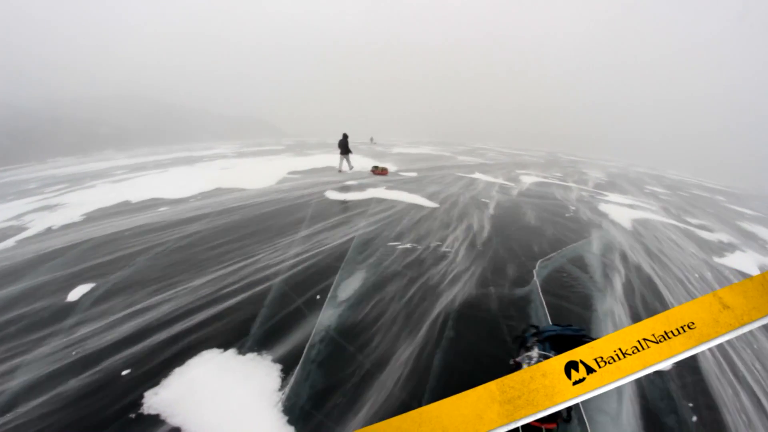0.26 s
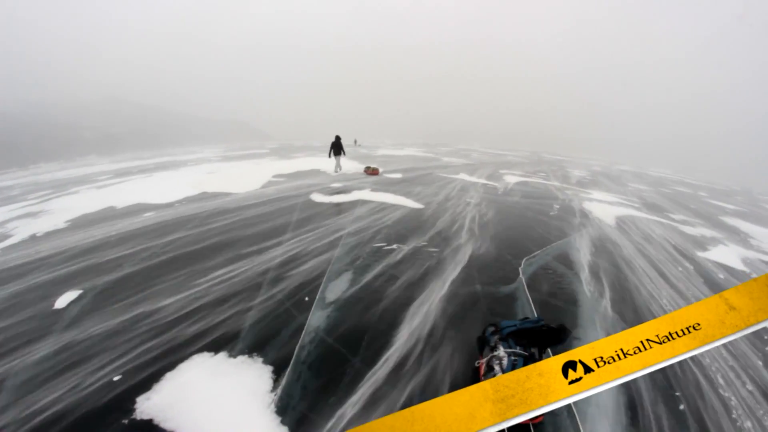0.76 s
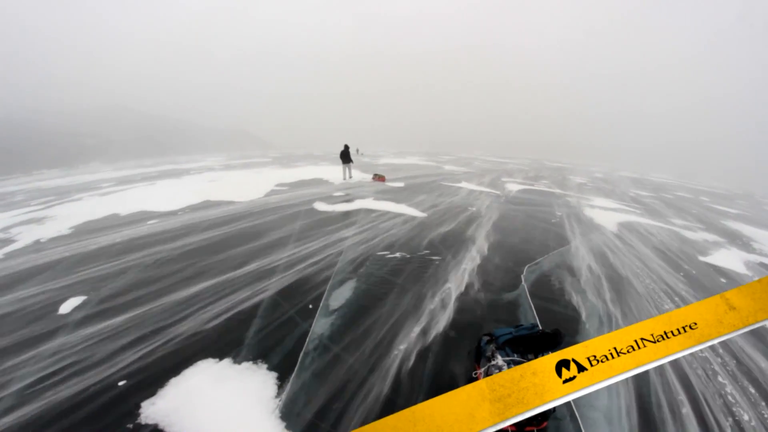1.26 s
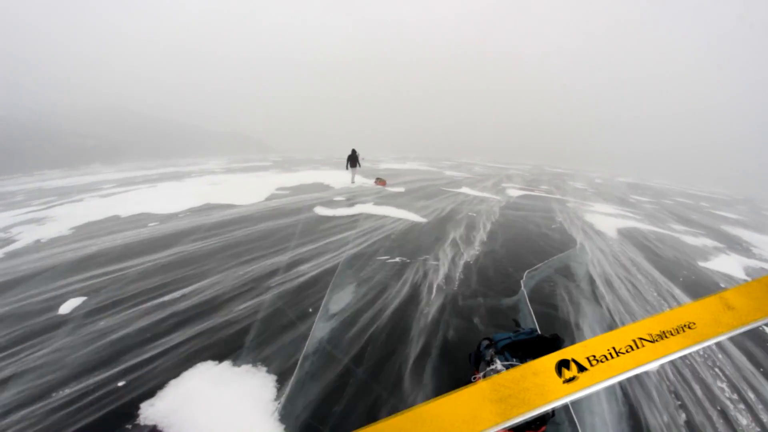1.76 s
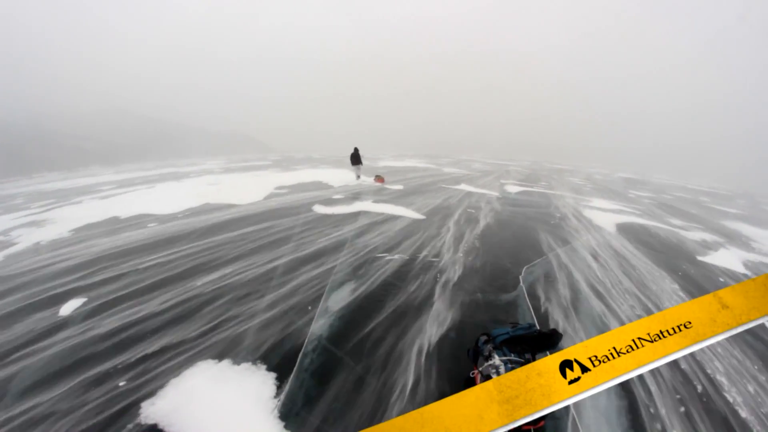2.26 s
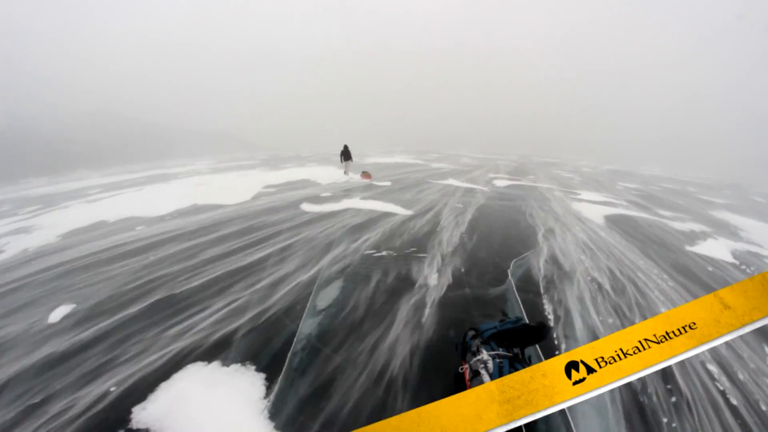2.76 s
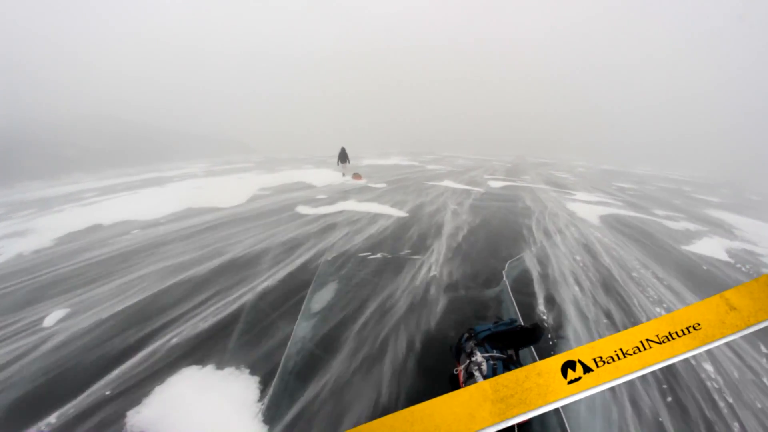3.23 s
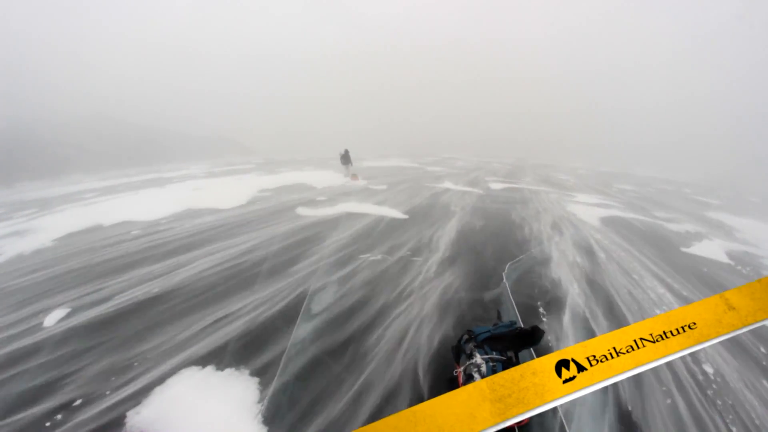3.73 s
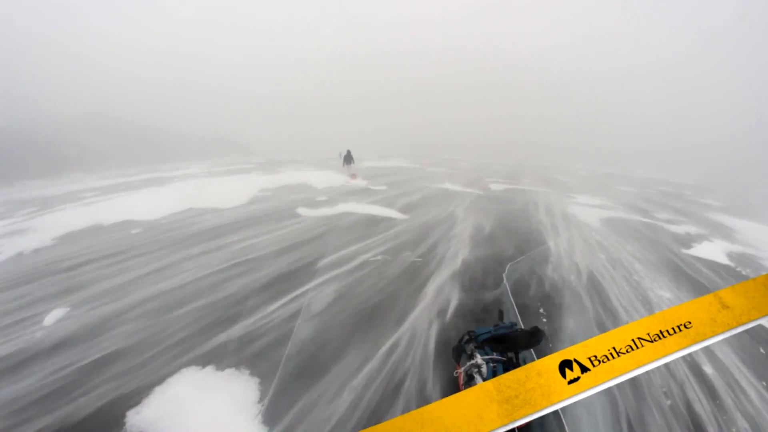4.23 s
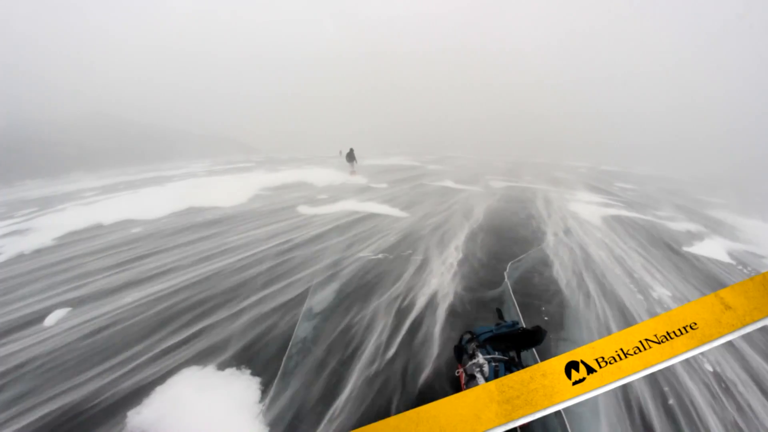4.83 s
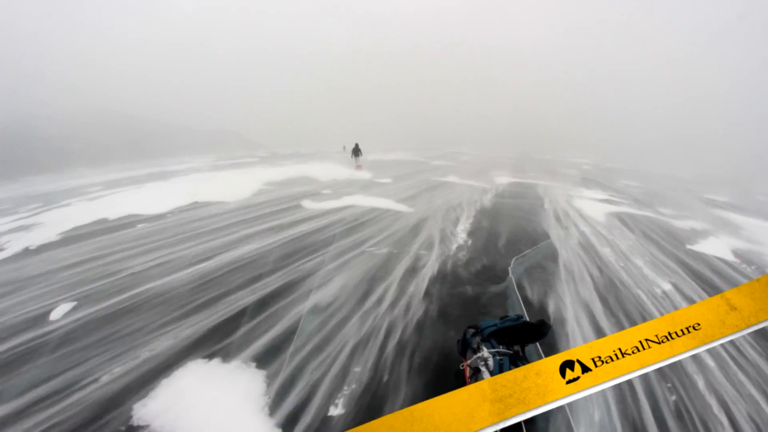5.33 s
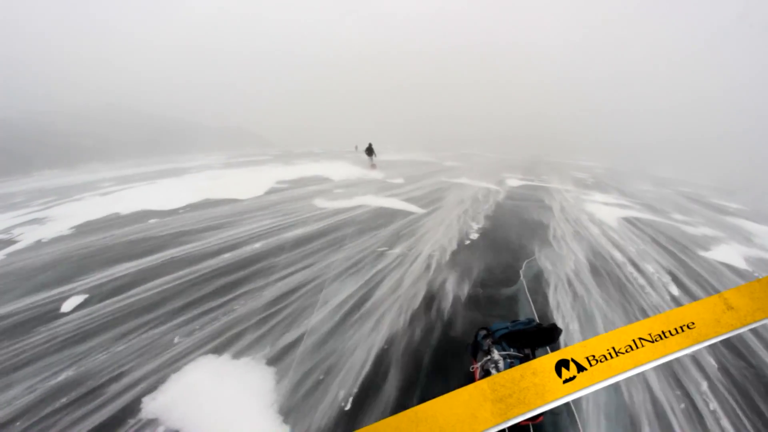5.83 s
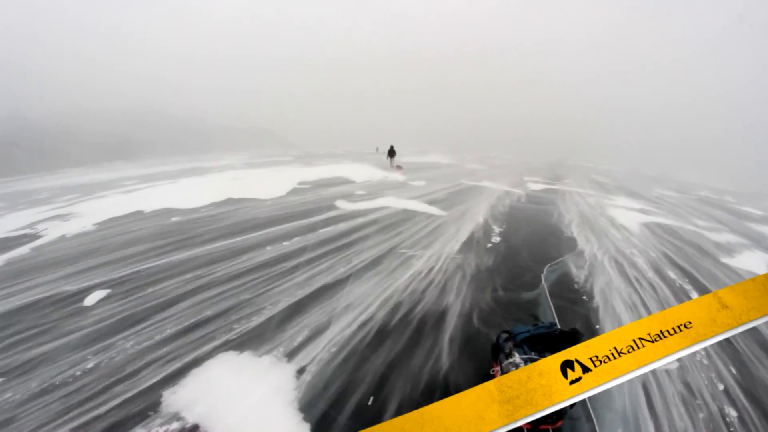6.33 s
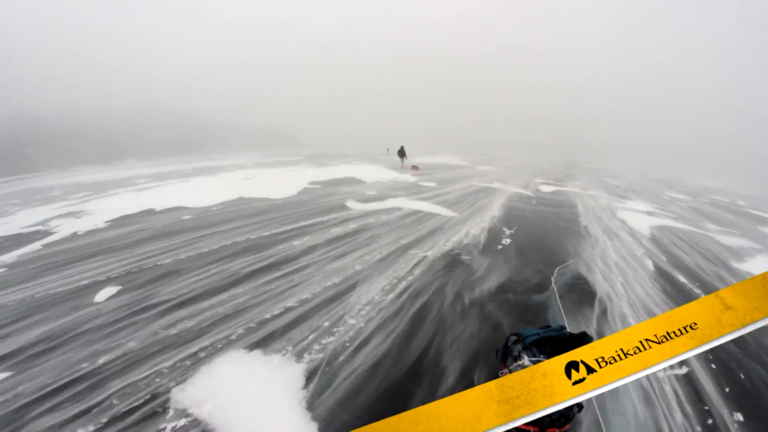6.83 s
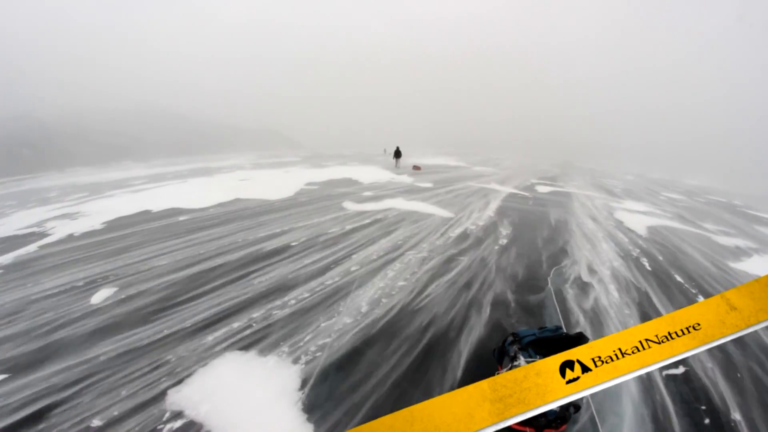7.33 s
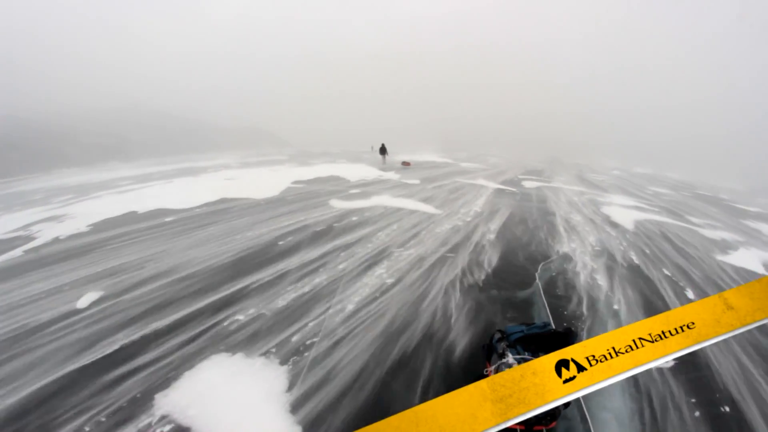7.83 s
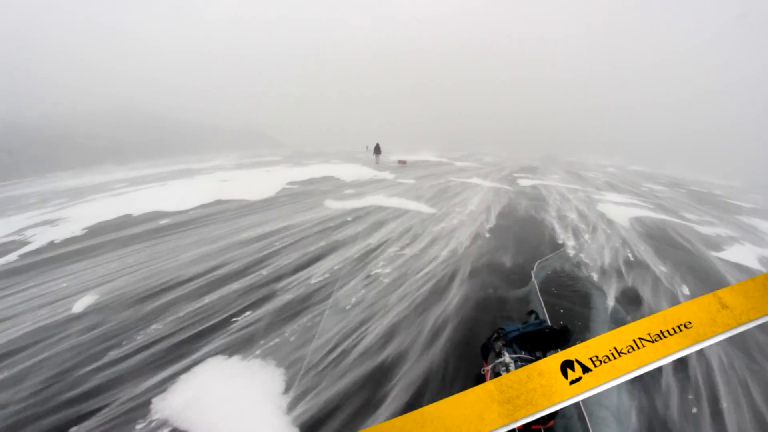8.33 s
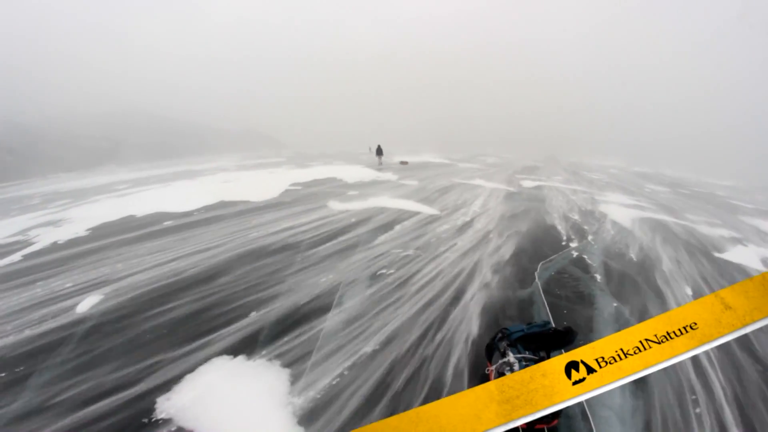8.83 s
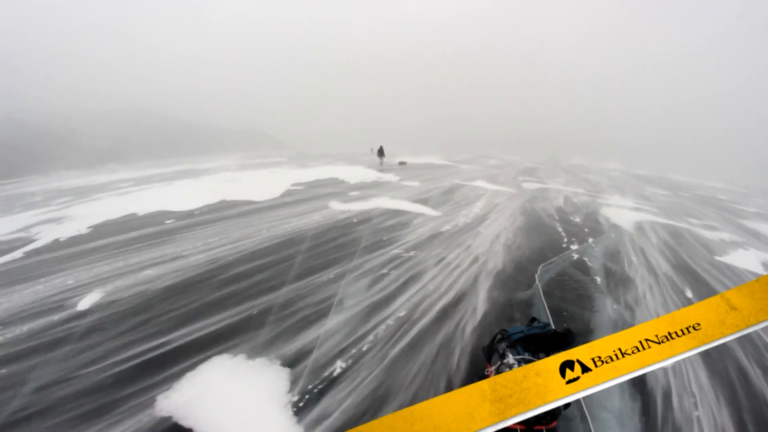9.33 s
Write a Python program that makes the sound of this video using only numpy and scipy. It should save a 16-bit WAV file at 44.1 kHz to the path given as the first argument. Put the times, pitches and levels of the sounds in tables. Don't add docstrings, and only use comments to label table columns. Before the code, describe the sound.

Nothing but blizzard wind hitting a tiny exposed microphone: a dense, overloaded, gritty roar at a nearly constant ceiling, with short dull slaps and millisecond gaps. A weaker, more heaving stretch comes early, a violent crackling passage fills the middle, a steadier rush follows, and a faster, higher-pitched gust peaks near the end. Dry, close, without echo, over open ice, with a thin hiss of drifting snow.

```python
import sys
import numpy as np
from scipy import signal
from scipy.fft import rfft, irfft, next_fast_len
from scipy.io import wavfile
from scipy.ndimage import uniform_filter1d, map_coordinates

SR = 44100
rng = np.random.default_rng(int(sys.argv[2]) if len(sys.argv) > 2 else 0)


def ratio_of_db(decibels):
    return 10 ** (np.asarray(decibels, float) / 20)


def bounce(signal):
    frames = np.transpose(np.atleast_2d(signal))
    limited = np.clip(frames, -1, 1)
    pcm = np.round(limited * 32767).astype(np.int16)
    wavfile.write(sys.argv[1], SR, pcm)


N = 422037
CUT_HZ = 260
RAIL = .0625


def wind(octaves):
    # t/s, force over the rail/dB, air speed/0-1, swirl/0-1
    gusts = [(0, 9.5, 0.59, 0.35), (.6, 8.5, 0.39, .4), (1.15, 10, 0.33, 1), (1.32, 3, 0.18, 1),
             (1.9, 4.5, 0.33, 0.95), (2.4, 10, .54, 0.15), (2.85, 9.5, .56, 0.65), (3.3, 10, .5, 0.56),
             (3.5, 10.5, 0.61, 0.68), (4.1, 12.5, 0.5, 0.76), (4.65, 17.5, 0.63, 0.73),
             (5.25, 11.5, .49, 0.78), (6.2, 10, 0.48, 0.3), (7.3, 9, 0.54, 0.13), (7.85, 17.5, 0.93, 0.35),
             (8.3, 16, 0.74, 0.05), (8.6, 12, 0.63, 0.16), (9.57, 12.5, 0.7, 0.44)]
    # f/Hz, density/dB
    eddy_spectrum = [(15, -18), (80, -14), (180, -5), (250, -2), (320, -3.5), (420, -5), (560, -10.5),
                     (900, -18.5), (1500, -29.5), (3000, -45.5), (8000, -58.5), (30000, -125)]
    # f/Hz, density/dB
    heave_spectrum = [(10, -9), (40, -6.5), (100, -4), (200, -13.5), (1000, -88)]
    force_db, speed, swirl = curves(gusts)
    lost_db = lulls()
    speed_lost_per_db = 0.0452
    speed = np.clip(speed - speed_lost_per_db * lost_db + 0.046 * wobble(20), 0, 1)

    rush = 0
    for step in np.arange(5) / 4:
        share = np.sqrt(np.clip(1 - 4 * np.abs(speed - step), 0, 1))
        rush = rush + share * eddies(eddy_spectrum, 2 ** (octaves * (step - .5)))

    heave_db = -20.5 + 16 * swirl
    heave = ratio_of_db(heave_db) * eddies(heave_spectrum)
    slow_db = .6 * wobble(15)
    unrest = .6 + 1.1 * swirl
    fast_db = 1.01 * wobble(70) + 1.49 * peaked(wobble(170), skew=0.24)
    flutter_db = slow_db + unrest * fast_db
    force = RAIL * ratio_of_db(force_db - lost_db + flutter_db - 0.33)
    return force * (rush + heave + blown_snow(swirl))


def lulls():
    # t/s of the middle, force lost/dB (below zero: a puff), length/ms
    lull_rows = [(.12, 2.5, 190), (.36, 5, 71), (.49, 3, 85), (.6, -2, 90), (.84, 7.5, 44), (1.23, 1.5, 60),
                 (1.52, -3, 90), (1.76, -3, 80), (1.93, 2, 46), (2.26, 1.5, 69), (2.53, 2.5, 84),
                 (2.87, 3, 45), (3.4, 4, 73), (3.49, -2.5, 76), (3.7, 3, 54), (4.38, -4, 78),
                 (4.5, 5.5, 108), (4.959, 6, 47), (5.39, 2.5, 100), (5.58, -3.5, 103), (5.9, -0.5, 79),
                 (6.12, 2.5, 150), (6.37, 3, 107), (6.55, 2.5, 48), (6.77, 2, 100), (7.1, 1, 97),
                 (7.68, 2.5, 230), (8.61, 2.5, 54), (8.95, 1, 90), (9.33, -2, 100)]
    t = np.arange(N) / SR
    lost_db = np.zeros(N)
    for s, db, ms in lull_rows:
        phase = np.clip((t - s) * 500 / max(ms, 20), -.5, .5)
        lost_db += db * np.cos(np.pi * phase) ** 2
    return lost_db


def slaps():
    # t/s, peak/dB, length/ms
    slap_rows = [(0.0694, -31, 5), (.301, -26.5, 7.9), (0.4342, -25, 7.2), (0.9238, -29, 9.9),
                 (1.146, -32, 6.5), (1.2606, -31, 7.4), (1.2999, -36, 9.1), (1.38, -36, 5.8),
                 (1.5564, -30, 5.2), (1.6317, -37, 4.7), (1.9713, -33, 6.2), (2.0612, -33, 7.1),
                 (2.2184, -30, 3.6), (2.4356, -18, 6.5), (3.4466, -30, 8.4), (3.914, -26, 6.5),
                 (4.271, -35, 6.8), (4.577, -20, 25), (4.9057, -23, 11), (5.002, -23, 9.9),
                 (5.0539, -25, 7.4), (5.4895, -19, 6.8), (6.0282, -31, 6.2), (6.212, -23, 8.3),
                 (6.5106, -32, 6.5), (6.86, -28, 17), (8.4463, -26, 8.7), (8.7954, -28, 5.7),
                 (9.1137, -19, 7.2), (9.469, -23, 12)]
    # f/Hz, density/dB
    slap_spectrum = [(50, -6.5), (400, -6), (900, -7.5), (2000, -19.5), (5000, -78), (20000, -93)]
    size = np.zeros(N)
    for s, db, ms in slap_rows:
        shape = signal.windows.tukey(max(round(ms * SR / 1000), 40), .7)
        size[round(s * SR) - 60:][:len(shape)] += ratio_of_db(db + 40.5) * shape
    return RAIL * size * eddies(slap_spectrum)


def stalled(x):
    # t/s, length/ms, time on the rail/ms, side/+-1
    stall_rows = [(0.6275, 4.4, 1.6, -1), (0.8627, 7.8, 1.6, 1.0), (0.9934, 4.1, 1.2, -1.0),
                  (1.2647, 4.8, 2.5, 1.0), (1.2701, 5.3, 0.5, -1), (1.4318, 6.9, 1.2, 1.0),
                  (1.6553, 4.4, 1.7, 1.0), (1.7406, 4.2, 1.4, 1.0), (3.8154, 3.0, 1.5, -1.0),
                  (3.9422, 3.7, 2.0, -1.0), (3.9695, 3.0, 0.3, -1), (4.3012, 12.2, 2.2, 1.0),
                  (4.3553, 3.2, 1.9, -1.0), (4.4162, 7.9, 1.8, -1.0), (4.4437, 4.2, 0.1, -1),
                  (4.5145, 4.2, 1.9, -1.0), (4.5492, 4.9, 1.4, -1.0), (4.5604, 13.2, 0.9, 1.0),
                  (4.6561, 5.1, 1.7, -1.0), (4.8184, 4.4, 2.0, -1.0), (4.9739, 4.0, 1.8, 1.0),
                  (5.3948, 8.1, 1.4, -1.0), (5.4271, 5.3, 1.3, 1.0), (5.6498, 2.6, 1.2, -1.0)]
    drain = np.exp(-2 * np.pi * CUT_HZ * np.arange(SR // 20) / SR)
    swing = np.hanning(64)[:32]
    free, held = np.ones(N), np.zeros(N)
    for s, ms, rail_ms, side in stall_rows:
        start, size = round(s * SR), round(ms * SR / 1000)
        end = start + size
        free[start:end] = 0
        held[start - len(swing):start] -= side * ratio_of_db(10.5) * swing
        held[start:end] += side * drain[:size] / drain[round(rail_ms * SR / 1000)]
        held[end:][:len(drain)] += side * ratio_of_db(11.5) * drain
    return x * uniform_filter1d(free, size=9) + RAIL * uniform_filter1d(held, size=15)


def blown_snow(swirl):
    # f/Hz, density/dB
    snow_spectrum = [(300, -18), (1500, -12), (4000, 1), (9000, -2.5), (20000, -6)]
    drift_db = -35.5 - 2 * swirl + 0.85 * wobble(300)
    return ratio_of_db(drift_db) * eddies(snow_spectrum)


def eddies(spectrum, shift=1):
    m = next_fast_len(N + 8192)
    hz = np.fft.rfftfreq(m, 1 / SR)
    f, db = np.transpose(spectrum)
    gain = ratio_of_db(np.interp(np.log(hz / shift + 1), np.log(f + 1), db))
    x = irfft(rfft(rng.standard_normal(m)) * gain, m)[:N]
    return x / np.std(wind_cut(x))


def wind_cut(x):
    return signal.lfilter(*signal.butter(1, CUT_HZ, "high", fs=SR), x)


def wobble(rate_hz):
    knots = rng.standard_normal(int(N * rate_hz / SR) + 4)
    return map_coordinates(knots, [np.arange(N) * rate_hz / SR])


def curves(rows):
    s, *cols = np.transpose(rows)
    return [np.interp(np.arange(N) / SR, s, c) for c in cols]


def peaked(x, skew):
    return x + skew * (x ** 2 - 1)


def scene():
    pressure = wind(octaves=1.62) + slaps()
    return stalled(wind_cut(pressure))[None]


def roll_off(x):
    return signal.sosfilt(signal.butter(12, 16460, fs=SR, output="sos"), x)


def record(dry):
    settling_db = .7 * np.exp(-np.arange(N) / SR / .4)
    squared = np.clip(dry, -RAIL, RAIL) * ratio_of_db(settling_db)
    coupled = signal.lfilter(*signal.butter(1, .7, "high", fs=SR), squared)
    hz = np.fft.rfftfreq(N, 1 / SR)
    top_hz = 15750
    edge = np.where(hz < top_hz, ratio_of_db(-2.5 * (hz / top_hz) ** 2), ratio_of_db(-30))
    return roll_off(irfft(rfft(coupled) * edge, N))


dry = scene()
out = record(dry)
bounce(out)
```